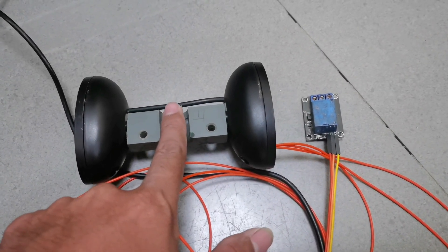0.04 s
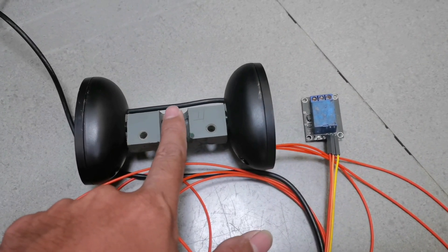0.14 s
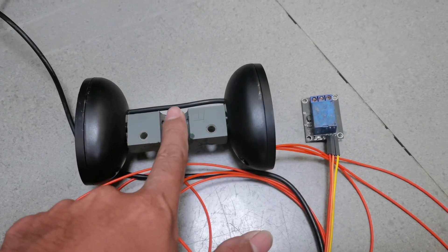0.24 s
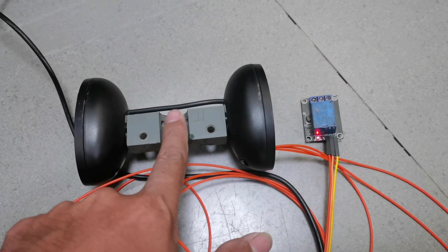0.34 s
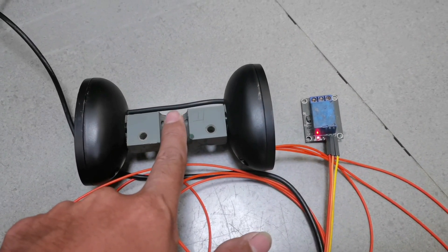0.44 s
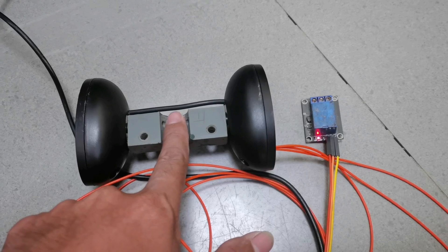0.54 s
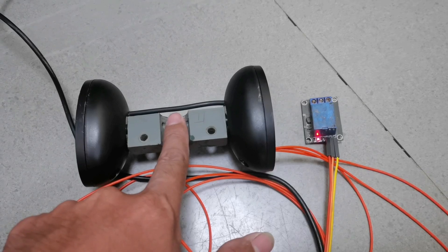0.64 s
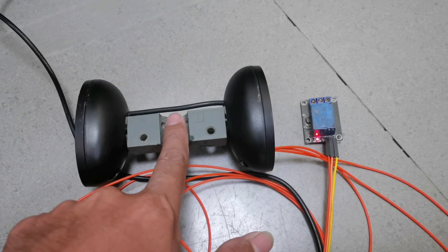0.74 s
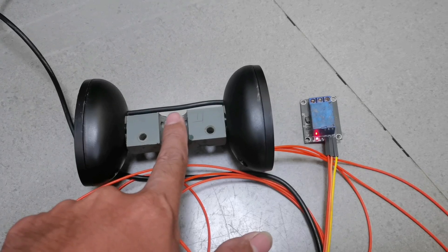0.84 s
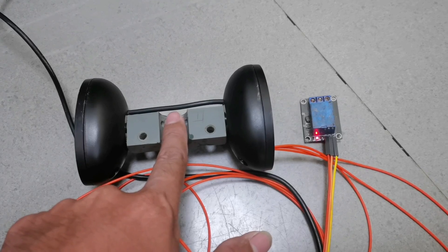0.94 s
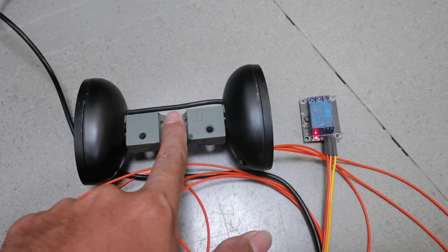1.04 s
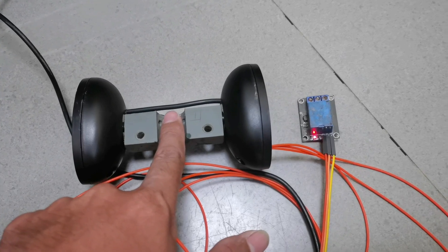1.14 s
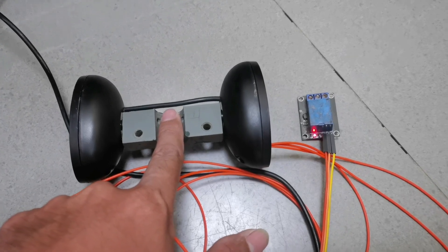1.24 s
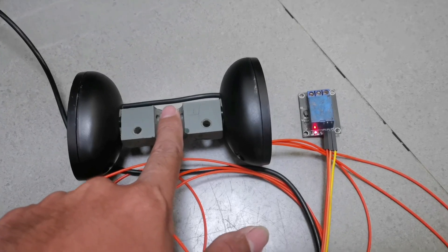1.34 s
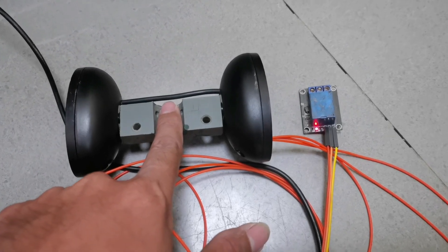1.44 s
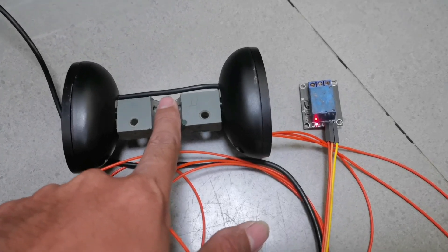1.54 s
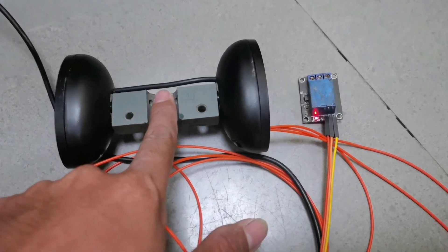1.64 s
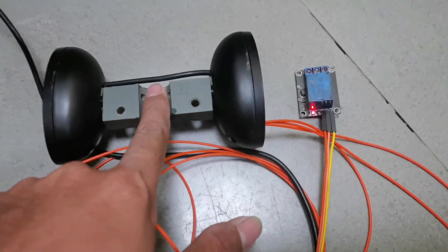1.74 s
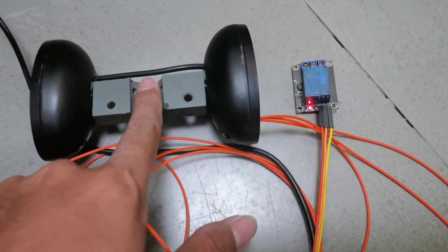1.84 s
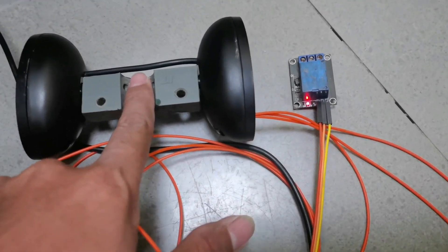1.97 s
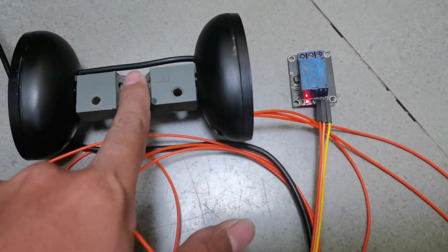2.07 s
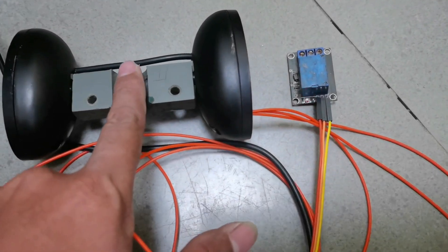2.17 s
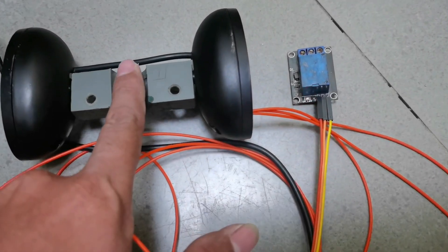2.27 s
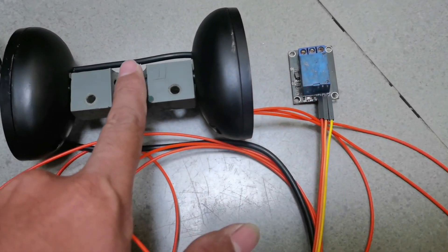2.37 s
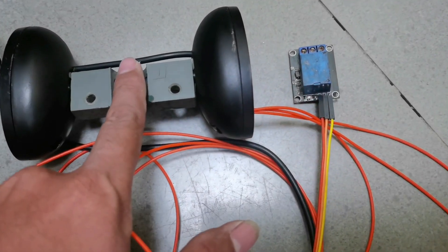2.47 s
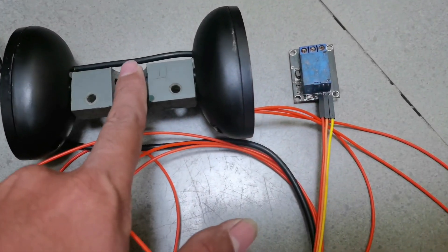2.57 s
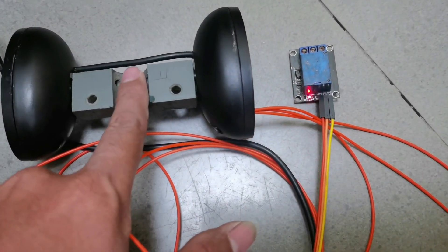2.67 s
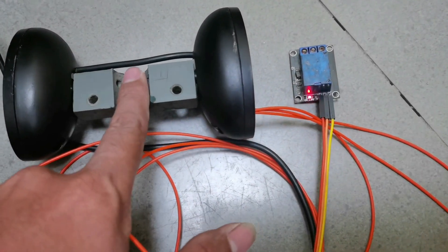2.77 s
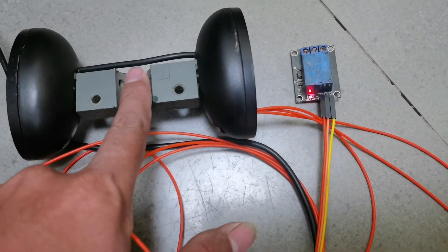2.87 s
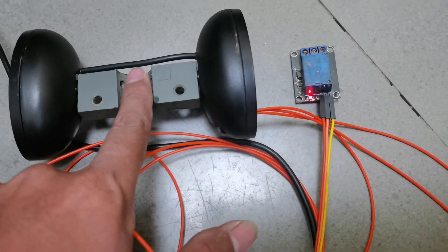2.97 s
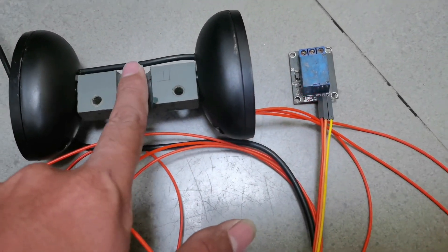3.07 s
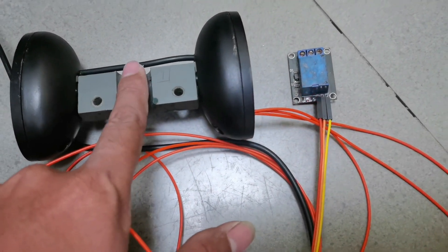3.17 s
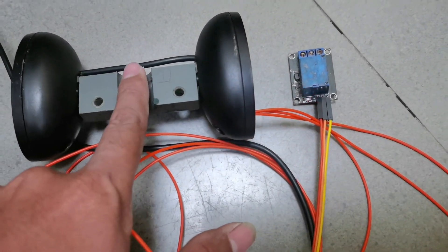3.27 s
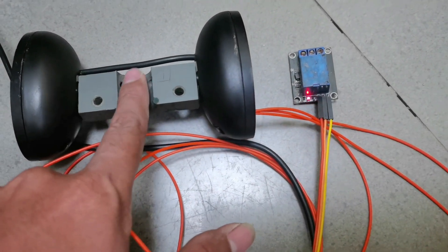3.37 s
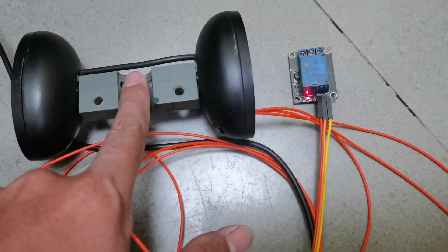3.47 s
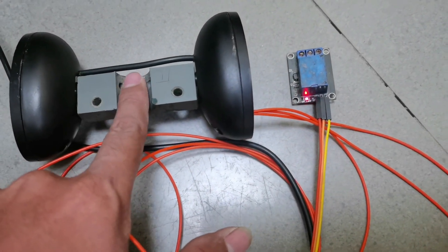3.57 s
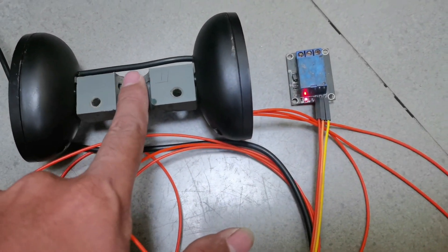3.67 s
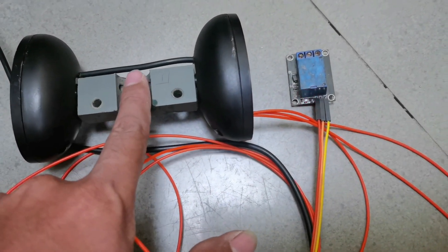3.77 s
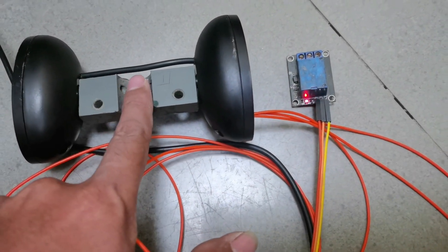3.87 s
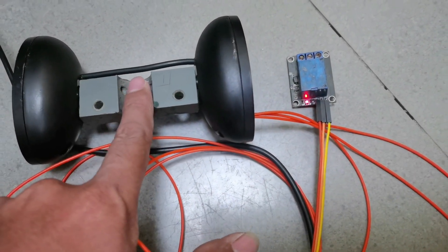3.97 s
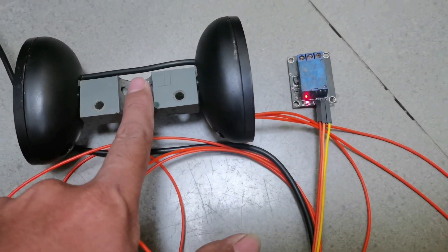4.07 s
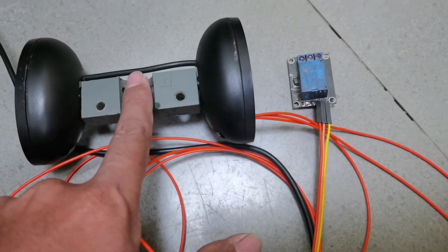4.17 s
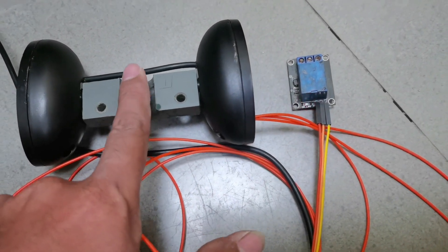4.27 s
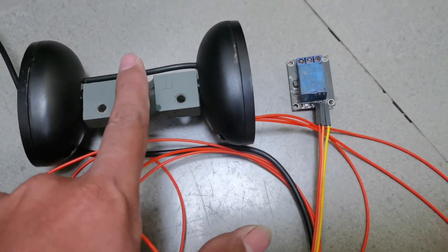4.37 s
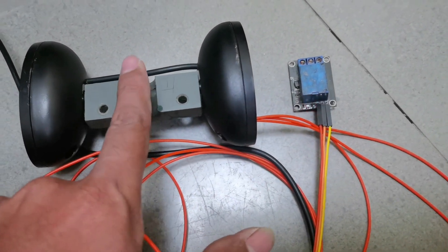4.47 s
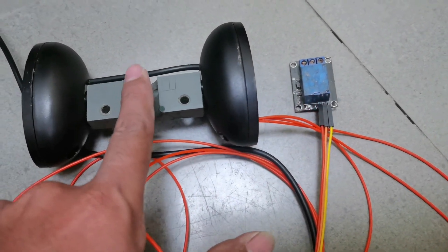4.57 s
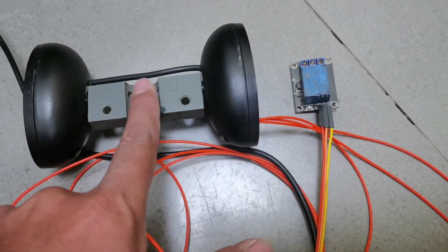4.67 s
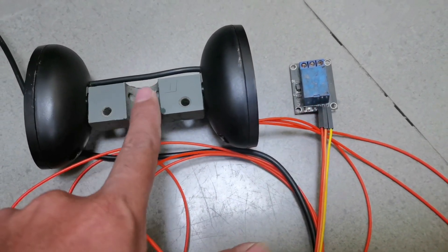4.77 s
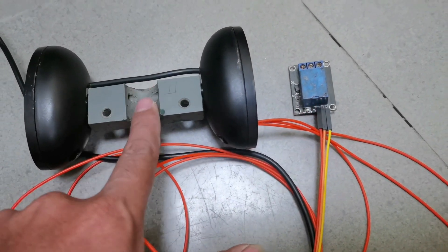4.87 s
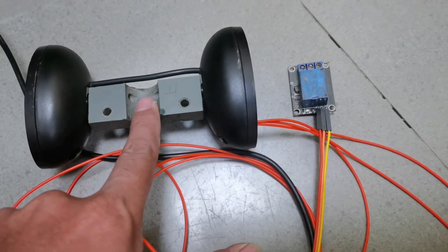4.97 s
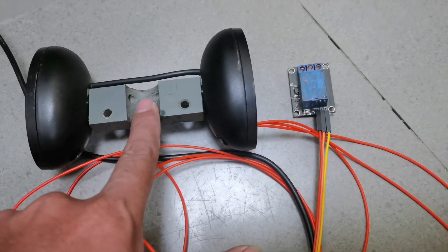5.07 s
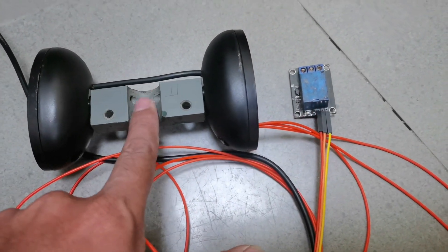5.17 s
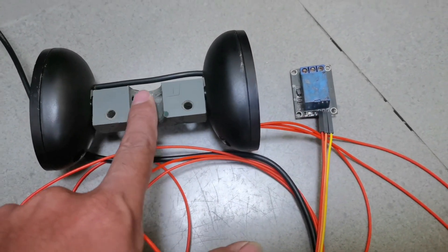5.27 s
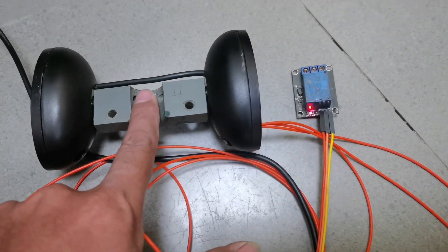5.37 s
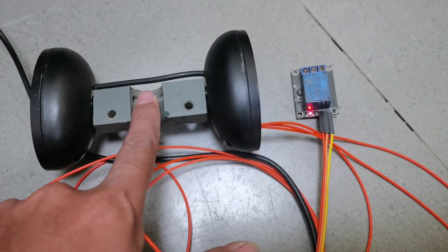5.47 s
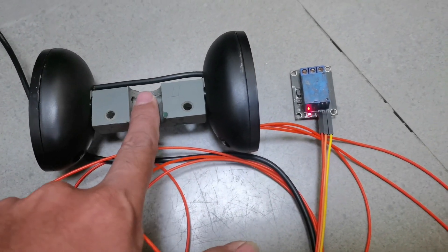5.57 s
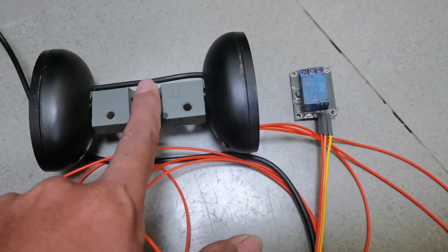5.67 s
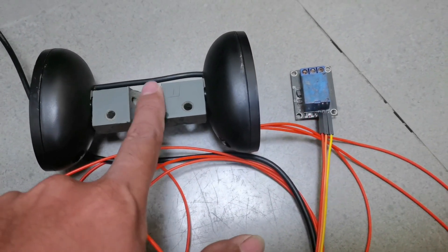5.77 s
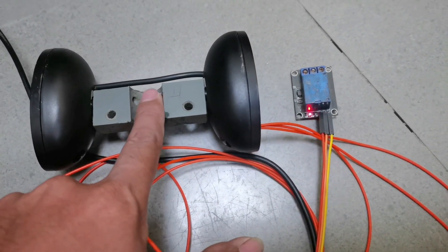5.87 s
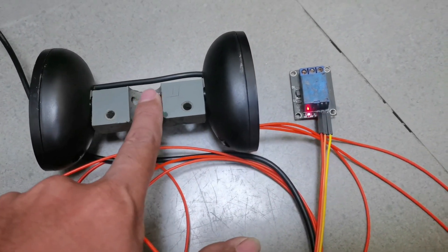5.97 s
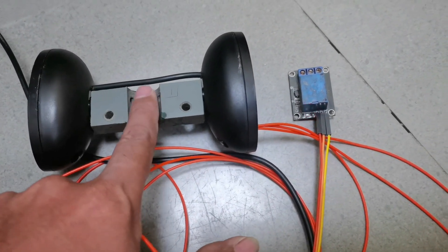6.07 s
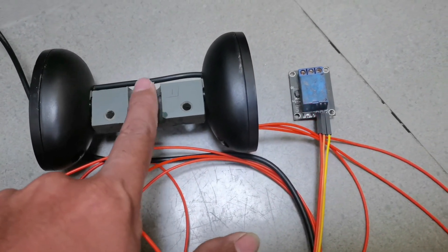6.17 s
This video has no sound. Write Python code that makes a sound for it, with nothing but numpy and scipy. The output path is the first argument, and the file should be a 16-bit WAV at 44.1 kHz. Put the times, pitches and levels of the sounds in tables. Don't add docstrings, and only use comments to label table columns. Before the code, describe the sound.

Sharp, dry little switch clicks snap at uneven intervals, each with a brief hard-surfaced echo, above soft rumbling room air and faint hiss.

```python
import sys
import numpy as np
from scipy import signal
from scipy.fft import rfft, irfft, next_fast_len
from scipy.io import wavfile
from scipy.ndimage import uniform_filter1d

SR = 44100
rng = np.random.default_rng(int(sys.argv[2]) if len(sys.argv) > 2 else 0)


def unload_wav(signal):
    wavfile.write(
        sys.argv[1],
        SR,
        np.round(np.clip(np.atleast_2d(signal).T, -1, 1) * 32767).astype(np.int16),
    )


def voltage_ratio(level):
    return 10 ** (np.asarray(level, float) / 20)


N = 274169


def at_hz(points, hz, column=1):
    points = np.array(points)
    return np.interp(np.log(hz), np.log(points[:, 0]), points[:, column])


def filtered(x, order, hz, kind):
    return signal.sosfilt(signal.butter(order, hz, kind, fs=SR, output="sos"), x)


def air_noise(colour):
    # frequency in Hz, left-right likeness (1 the same, -1 opposed).
    likeness = [(60, 0.96), (130, 0.72), (290, 0.83), (640, 0.66), (1410, -0.14), (3100, 0.07),
                (6820, -0.38), (15000, 0.67)]
    # frequency in Hz, left minus right in dB.
    lean = [(60, 2.5), (110, 1.5), (200, 3.5), (380, 2.5), (700, 4), (1290, 0.5), (2380, -5.0), (4400, -11),
            (8120, 1), (15000, -5)]
    size = next_fast_len(N)
    hz = np.maximum(np.arange(size // 2 + 1) * SR / size, 1)
    mid, side = rfft(rng.standard_normal((2, size)))
    alike = np.clip(at_hz(likeness, hz), -.9, .9)
    pair = np.sqrt(1 + alike) * mid + np.sqrt(1 - alike) * side * [[1], [-1]]
    pan = voltage_ratio(at_hz(lean, hz) / 2 * [[1], [-1]])
    inside = (hz > colour[0][0]) & (hz < colour[-1][0])
    pair = irfft(pair * pan * voltage_ratio(at_hz(colour, hz)) * inside, size)[:, :N]
    return pair / np.sqrt(np.mean(pair.mean(axis=0) ** 2))


def background():
    # time in seconds, level of its upper rush in dB.
    air = [(0.0, -63), (0.26, -61.5), (0.43, -59), (1.0, -57.5), (1.19, -53.5), (1.59, -62), (2.2, -64),
           (2.46, -56.5), (2.84, -63.5), (3.08, -63), (3.98, -56), (4.38, -57), (4.55, -60.5), (4.79, -59),
           (5.06, -58.5), (6.01, -54), (6.22, -52)]
    # frequency in Hz, density in dB per Hz.
    rumble = [(11, -41), (18, -10.5), (43, 2), (65, -2.5), (118, -2.5), (153, 2), (193, 2.5), (238, 0.5),
              (259, -6.5), (290, -5), (340, -22), (440, -58.5), (750, -120)]
    rush = [(190, -33), (330, -12), (475, -7), (505, -5.5), (576, -6.5), (623, -3), (662, -6.5), (710, 0.5),
            (875, -6), (991, -7), (1080, -2), (1170, -4.5), (1300, -3.5), (1460, -4.5), (2100, -8.5),
            (2730, -54.5), (4620, -120)]
    upper_rush = [(1180, -21), (2000, -20.5), (2150, -4), (2810, -1.5), (3300, -8.5), (3810, -6.5),
                  (4100, -7), (4340, -9), (4830, -23.5), (5000, -24.5), (6500, -38), (11000, -120)]
    hiss = [(2820, -43), (4800, -30.5), (5710, -3), (5950, -6), (6990, 1.5), (7580, 3.5), (8120, -4),
            (9040, -2), (9370, -20), (9650, -24.5), (9800, -26), (12700, -53.5), (21600, -120)]
    mic_hiss = [(5760, -36), (9800, -8.5), (11500, -4), (14000, -6.5), (15100, -2.5), (16200, -18),
                (16300, 8), (16500, -31)]
    # centre in seconds, half length in seconds, level in dB.
    lulls = [
        (.95, 0.152, -4),
        (1.433, 0.21, -3.5),
        (2.25, .2, 2.5),
        (2.93, .14, -2.5),
        (3.71, 0.08, -3),
        (4.407, 0.066, -4),
        (4.85, 0.095, -3),
        (6.1, 0.18, -0.5),
    ]
    t = np.arange(N) / SR
    calm_db = -59
    flow_db = np.interp(t, *np.transpose(air)) - calm_db
    rumble_db = -47.5 - .01 * flow_db
    for centre_s, half_s, db in lulls:
        rumble_db = rumble_db + db * np.exp(-((t - centre_s) / half_s) ** 2)
    rush_db = -51.5 + .55 * flow_db
    upper_db = -56.5 + 1.1 * flow_db
    calm_hiss_db = -72
    hiss_db = np.clip(calm_hiss_db + 3.5 * flow_db, -79.5, -67)
    mic_hiss_db = -79 + .25 * (hiss_db - calm_hiss_db)

    surges = uniform_filter1d(rng.standard_normal((4, N // 1000 + 2)), size=4, axis=1) * 2
    # colour, level in dB, depth of the random surges in dB.
    layers = [(rumble, rumble_db, 2.3), (rush, rush_db, 1.2), (upper_rush, upper_db, 0.91), (hiss, hiss_db, 0.66)]
    out = voltage_ratio(mic_hiss_db) * air_noise(mic_hiss)
    for (colour, level_db, surge_db), surge in zip(layers, surges):
        swell = np.interp(np.arange(N) / 1000, np.arange(len(surge)), surge)
        out = out + voltage_ratio(level_db + surge_db * swell) * air_noise(colour)
    return out


def far_tick():
    start_s, level_db, spread_s = .142, -41, .06
    t = np.arange(N) / SR - start_s
    fade = voltage_ratio(level_db - 10 * np.maximum(t, 0) / spread_s)
    return filtered(fade * rng.standard_normal(N) * (t > 0), 3, (6260, 9090), "band")


def switch(events, bounces, modes, longest_s, loose_ms, loose_db):
    right_lag_ms, lead, tail = 0.395, 200, 1200
    after_ms, bounce_db = np.transpose(bounces)
    hz, left_db, right_db, t60 = np.transpose(modes)[:, :, None]
    t60 = np.minimum(t60, longest_s)
    sign = (-1.) ** np.arange(len(modes))[:, None]
    t = np.arange(-lead, tail) / SR
    out = np.zeros((2, N + tail))
    chance = rng.standard_normal((len(events), len(bounces), 1 + len(modes)))
    for (s, strength_db), luck in zip(events, chance):
        start = round(s * SR) - lead
        for ms, db, own in zip(after_ms, bounce_db, luck):
            strike_ms = ms + loose_ms * own[0]
            strike_db = strength_db + db + loose_db * own[1:, None]
            for port, (mode_db, lag_ms) in enumerate([(left_db, 0), (right_db, right_lag_ms)]):
                since = np.maximum(t - (strike_ms + lag_ms) / 1000, 0)
                level = voltage_ratio(strike_db + mode_db - 60 * since / t60)
                ring = sign * level * np.sin(2 * np.pi * hz * since)
                out[port, start:start + len(t)] += np.sum(ring, axis=0)
    return filtered(out[:, :N], 4, [3000, 16000], "band")


def pull_in(longest_s):
    # start in seconds, strength in dB.
    events = [
        (0.5519, -.6),
        (2.8183, 1.3),
        (3.5970, .7),
        (4.0677, -.5),
        (5.5872, 1.0),
        (6.0586, -.4),
    ]
    # milliseconds after the main strike, level in dB.
    bounces = [
        (-1.127, -16.4),
        (-0.0, 3.2),
        (0.783, 2.4),
        (1.575, -5.8),
        (3.209, -11.7),
        (5.581, -14.7),
    ]
    # frequency in Hz, left in dB, right in dB, t60 in seconds.
    modes = [(4380, -30.6, -32.0, 0.0088), (4770, -28.2, -25.8, 0.0025), (5450, -23.9, -31.8, 0.0067),
             (5870, -13.2, -20.7, 0.012), (6040, -23.2, -31.4, 0.0135), (7080, -14.1, -13.1, 0.022),
             (7490, -36.2, -26.5, 0.022), (7820, -16.1, -30.3, 0.0117), (8450, -12.3, -18.2, 0.022),
             (8920, -33.5, -48.8, 0.0159), (9570, -11.5, -21.4, 0.0187), (9760, -19.0, -34.2, 0.0217),
             (10800, -15.8, -12.8, 0.0021), (11140, -23.1, -18.2, 0.004), (11950, -25.5, -29.0, 0.0046),
             (12420, -29.1, -55.0, 0.0066), (12770, -32.7, -29.3, 0.0085), (13540, -27.4, -33.4, 0.022),
             (14470, -39.0, -44.8, 0.022), (15680, -32.3, -40.5, 0.0193)]
    return switch(events, bounces, modes, longest_s, loose_ms=.005, loose_db=.8)


def drop_out(longest_s):
    # start in seconds, strength in dB.
    events = [
        (2.3293, .9),
        (3.2405, .7),
        (3.9085, .5),
        (4.3359, -.2),
        (5.8417, -.4),
    ]
    # milliseconds after the main strike, level in dB.
    bounces = [
        (-0.937, -13.3),
        (-0.034, -0.9),
        (0.86, -7.4),
        (2.389, -3.0),
        (3.407, -13.1),
        (4.768, -9.5),
        (6.194, -14),
    ]
    # frequency in Hz, left in dB, right in dB, t60 in seconds.
    modes = [(3870, -30.4, -55.0, 0.0024), (4140, -36.6, -33.6, 0.0159), (4690, -25.3, -25.3, 0.0022),
             (5920, -23.2, -55.0, 0.003), (6650, -10.3, -21.0, 0.0067), (6670, -10.4, -27.7, 0.0051),
             (7150, -16.2, -14.3, 0.0181), (7390, -15.7, -9.8, 0.0192), (7980, -15.7, -24.9, 0.0114),
             (8450, -47.6, -21.8, 0.0033), (8840, -14.4, -26.1, 0.0096), (9490, -15.5, -25.0, 0.0047),
             (9870, -39.5, -39.7, 0.022), (10790, -34.2, -27.1, 0.0158), (11240, -29.3, -28.2, 0.0141),
             (11400, -17.9, -17.1, 0.0036), (12290, -30.2, -35.2, 0.0066), (13950, -33.9, -41.9, 0.0104),
             (14700, -36.2, -42.0, 0.0126), (15400, -25.9, -32.6, 0.0128)]
    return switch(events, bounces, modes, longest_s, loose_ms=.008, loose_db=1.0)


def room(pull, drop):
    # frequency in Hz, t60 in seconds, left minus right in dB, pull-in send in dB, drop-out send in dB.
    bands = [(2980, 0.19, -6.5, 7, 8), (3870, 0.61, -9, 4, 16.5), (4320, 0.19, -5, -4.5, 1.5),
             (4940, 0.26, 1, -1.4, -2), (6460, 0.77, -1.5, -11.5, -7.5), (7260, 0.31, -7, 3.5, -1),
             (8500, 0.3, -4, -5, 2.5), (9630, 0.45, -2, -5, -8), (11000, 0.12, -4, -11.5, 0),
             (13700, 0.068, 8, 9.5, -1), (13300, 0.9, 2, 0, -1), (15500, .33, -3, 5, -.5)]
    room_db, early_db, early_t60_s, first_echo_ms = -32.5, 6.5, 0.095, 5
    short_tails_hz, short_t60_s = 10500, .27
    t = np.arange(SR // 2) / SR
    edges = 2500 * 2 ** np.arange(0, 2.8, 1 / 5)
    echoes = 0
    for low, high in zip(edges, edges[1:]):
        band = filtered(rng.standard_normal((2, len(t))), 2, [low, high], "band")
        t60, side_db, *send_db = [at_hz(bands, np.sqrt(low * high), column=c) for c in range(1, 5)]
        if low > short_tails_hz:
            t60 = min(t60, short_t60_s)
        fade = voltage_ratio(-60 * t / t60) + voltage_ratio(early_db - 60 * t / early_t60_s)
        pan = voltage_ratio(side_db / 2 * np.array([[1], [-1]]))
        echoes = echoes + band * fade * pan * voltage_ratio(send_db)[:, None, None]
    echoes = echoes * np.clip(t * 1000 / first_echo_ms - 1, 0, 1)
    wet = signal.fftconvolve(np.array([pull, drop]), echoes, axes=2).sum(axis=0)
    return voltage_ratio(room_db) * wet[:, :N]


def scene():
    air = background()
    direct = filtered(pull_in(longest_s=.018), 4, 4000, "high") + drop_out(longest_s=.018)
    blurred_s = .006
    return air + direct + room(pull_in(blurred_s), drop_out(blurred_s) + far_tick())


def starve_treble(x):
    # frequency in Hz, dB under the loudest treble band where a band is muted.
    dropped_under = [(4700, 18.5), (5500, 12), (6400, 11), (7000, 35), (9300, 37), (9900, 13), (11500, 23),
                     (13000, 24), (14500, 18), (15500, 19), (16300, 10.5)]
    luck_db, rush_masks_db, loud_grace, attack_db = 8.5, -8, .3, 12
    hz, _, frames = signal.stft(x, SR, "cosine", nperseg=2048)
    edges = np.searchsorted(hz, np.arange(4270, 17200, 430))
    power = np.add.reduceat(np.abs(frames) ** 2, edges, axis=1).sum(axis=0)[:-1]
    rush_db, level_db = np.split(10 * np.log10(power + 1e-20), [1])
    loudest_db = np.maximum(level_db.max(axis=0), rush_db[0] + rush_masks_db)
    allowed_db = at_hz(dropped_under, hz[edges[1:-1]])[:, None]
    allowed_db = allowed_db + loud_grace * (loudest_db - np.median(loudest_db))
    luck = uniform_filter1d(rng.standard_normal(level_db.shape), size=4, axis=1) * 2
    attack = np.diff(loudest_db, prepend=0) > attack_db
    kept = (level_db + allowed_db + luck_db * luck > loudest_db) | attack | np.roll(attack, 1)
    frames[:, edges[1]:edges[-1]] *= np.repeat(kept, np.diff(edges[1:]), axis=0)
    return signal.istft(frames, SR, "cosine", nperseg=2048)[1][:, :N]


def band_limit(x):
    return signal.sosfilt(signal.butter(12, 17160, fs=SR, output="sos"), x)


def record(dry):
    dip_hz, dip_width_hz, dip_share = 7090, 590, .45
    dry = dry - dip_share * signal.lfilter(*signal.iirpeak(dip_hz, dip_hz / dip_width_hz, SR), dry)
    top_cut = signal.cheby2(8, 50, 17700, fs=SR, output="sos")
    mix = starve_treble(signal.sosfilt(top_cut, dry))
    return band_limit(mix)


dry = scene()
out = record(dry)
unload_wav(out)
```